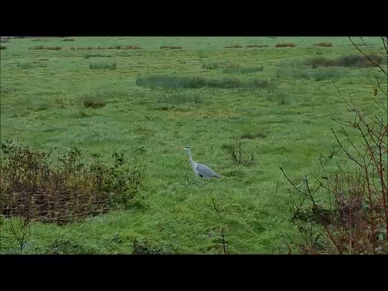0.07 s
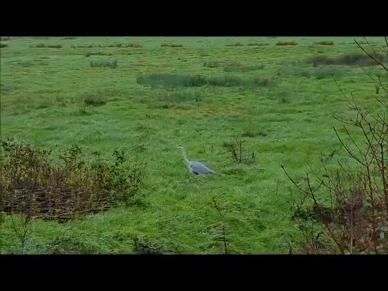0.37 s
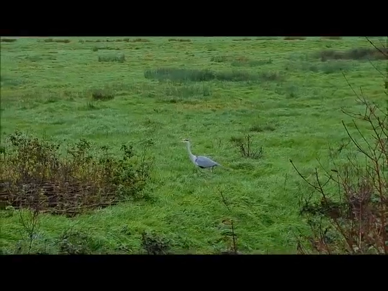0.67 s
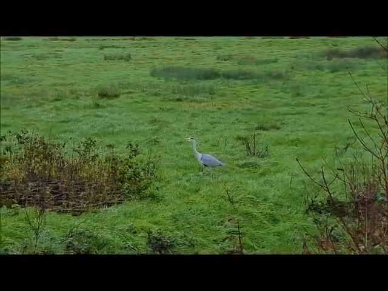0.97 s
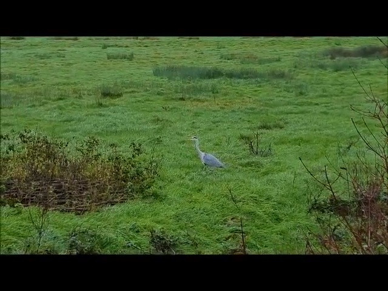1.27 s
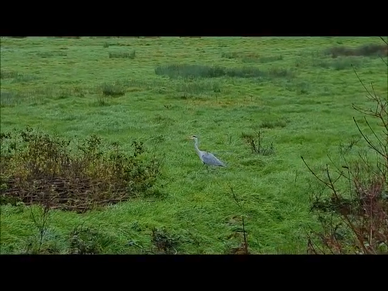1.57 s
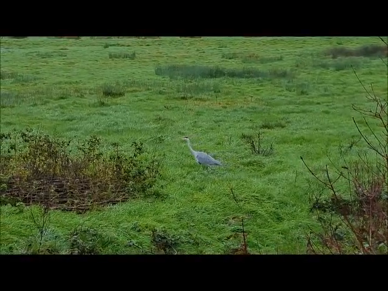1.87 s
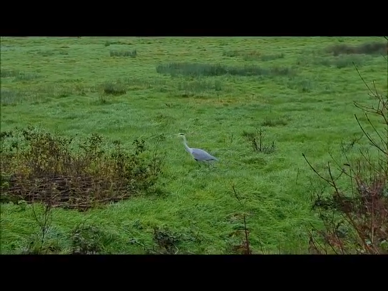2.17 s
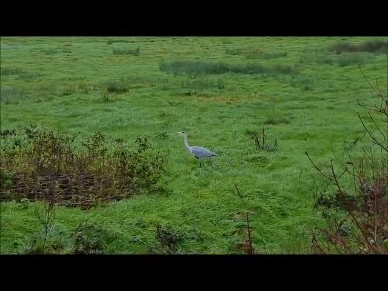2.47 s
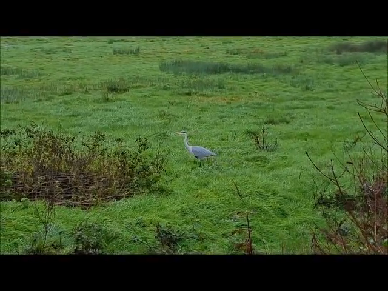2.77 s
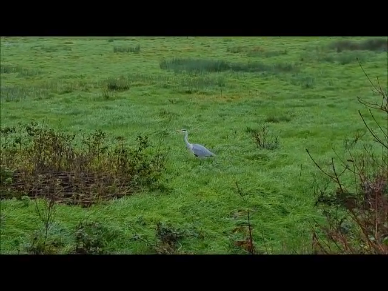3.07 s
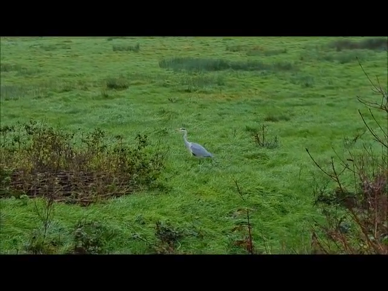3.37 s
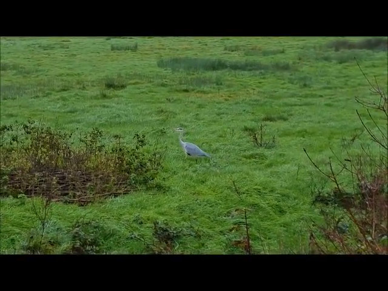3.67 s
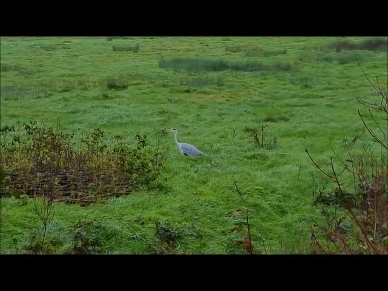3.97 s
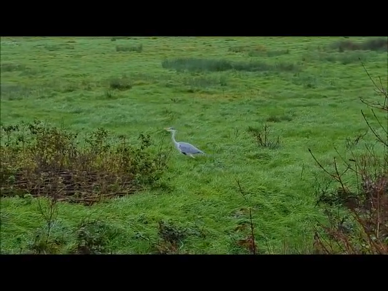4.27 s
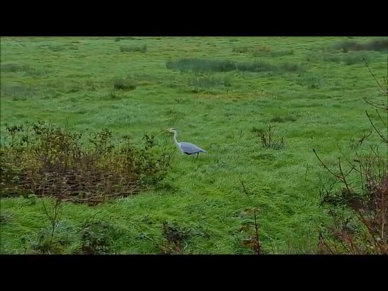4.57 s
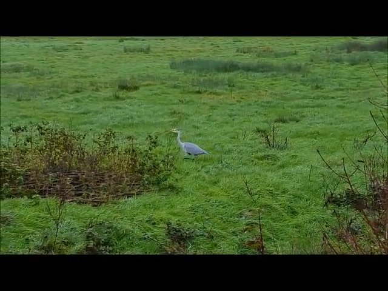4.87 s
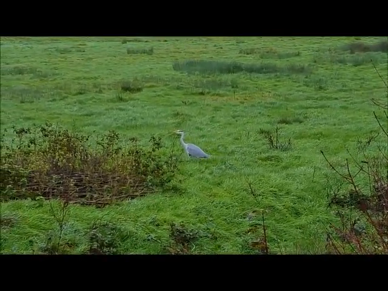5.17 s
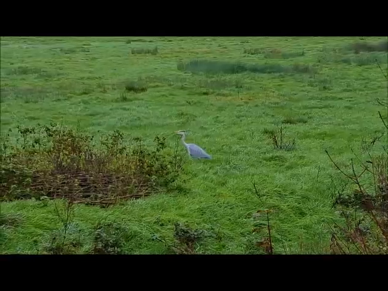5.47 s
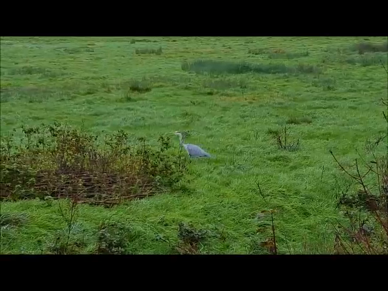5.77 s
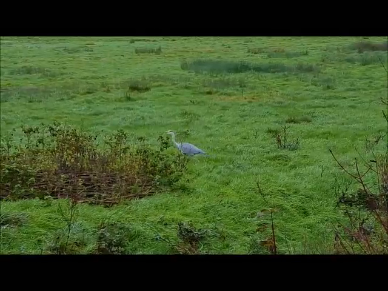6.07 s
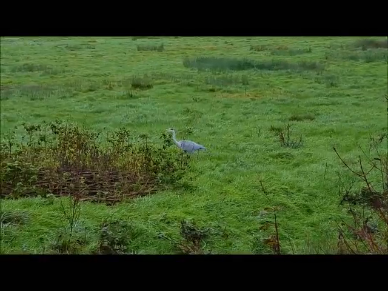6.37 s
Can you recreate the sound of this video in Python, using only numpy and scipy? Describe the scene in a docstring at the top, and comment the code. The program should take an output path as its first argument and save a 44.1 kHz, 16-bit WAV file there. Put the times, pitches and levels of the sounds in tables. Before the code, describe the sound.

Distant traffic rumbles over a meadow with faint bird chirps, broken by a ringing metal clank and a later dry clack.

```python
"""Far traffic fades in over a wet meadow: tyre roar, low rumble, droning engines.
Nearby metal strikes, bounces and rings; later something shuts with a dry clack. Both echo.
Small birds whistle, chirp and tick among soft rustles and light clicks.
A faint hiss on the right stops with a click."""
import sys
import numpy as np
from scipy import signal
from scipy.fft import rfft, irfft, next_fast_len
from scipy.io import wavfile
from scipy.ndimage import uniform_filter1d

SR = 44100
rng = np.random.default_rng(int(sys.argv[2]) if len(sys.argv) > 2 else 0)


def materialize(psi):
    """Save the field psi as 16-bit PCM at rate SR to the path in sys.argv[1].

    A 1-D psi becomes a single channel; in a 2-D psi each row is a channel.
    """
    bounded = np.clip(np.atleast_2d(psi).T, -1, 1)
    quanta = np.round(bounded * 32767).astype(np.int16)
    wavfile.write(sys.argv[1], SR, quanta)


N = 283563
TIME_S = np.arange(N) / SR

# noise spectra, shape only: freq_hz, density_db
RUMBLE_SPECTRUM = [(10, -15), (27, -10.5), (42, -4.5), (60, -1.2), (80, 0), (100, -1.8), (125, -5.3),
                   (165, -11.5), (235, -15), (330, -26), (600, -54)]
ROAR_SPECTRUM = [(60, -22), (250, -5.5), (340, -6.3), (480, -1.8), (600, -.4), (730, -2.6), (980, 1.9),
                 (1300, -2.9), (1650, -4.1), (2050, -10.2), (2500, -17.6), (3200, -22.2), (4400, -31.2),
                 (9000, -50)]
THUD_SPECTRUM = [(100, -36), (450, 17), (1000, 6), (2000, 4.5), (2700, 2.5), (4300, -10), (6300, -30),
                 (9000, -58), (14000, -68)]
RATTLE_SPECTRUM = [(300, -5), (2000, -2.5), (2900, 2), (3700, 10), (4750, 3.5), (5400, -13), (6400, -8),
                   (8500, -42), (14000, -67)]
BOOM_SPECTRUM = [(120, -16), (300, -9.5), (480, 8.5), (720, -5), (980, 6.5), (1400, -2), (2000, -28),
                 (2600, -40), (6000, -43), (12000, -72)]
SNAP_SPECTRUM = [(400, 2.5), (1000, 3), (1800, -8), (2600, 9), (3100, -13), (4100, 2), (5000, -6),
                 (5700, -2.5), (6500, -29), (9000, -37), (14000, -50)]
KNOCK_SPECTRUM = [(150, -1), (350, -6.5), (530, 3), (780, -1), (1100, 2.5), (1700, 7), (2200, -2.5),
                  (2450, 4.5), (3000, -6.5), (3450, 0), (4700, -9), (5700, -18), (7000, -30), (12000, -66)]
CLICK_SPECTRUM = [(800, -31), (2000, -8.5), (2500, 13.5), (3150, 8), (4000, -8), (5300, 1), (8000, -22),
                  (15000, -27)]
HISS_SPECTRUM = [(1500, -14), (2400, 1.5), (2950, 6.5), (3700, -5.5), (4700, -11), (6200, -4.5),
                 (6900, -11.5), (8000, -17.5), (10000, -26), (15000, -30)]
RUSTLE_SPECTRUM = [(2000, 18), (5000, -1), (7500, 11.5), (10000, -3), (13000, 7), (15500, -3)]
MIC_SPECTRUM = [(3000, 11), (6500, 5), (8000, 3), (10000, -38), (12500, 1), (15500, 4.5)]
# traffic level curves: time_s, level_db
RUMBLE_LEVELS = [(.85, -51.5), (1.05, -47.5), (2.08, -44), (2.18, -48), (2.4, -45), (6.43, -44.5)]
ENGINE_LEVELS = [(.7, -50.5), (1.05, -43), (2.15, -54.5), (2.55, -42.5), (3.65, -52), (4.3, -45.5),
                 (5, -51), (5.5, -45), (6.43, -43.5)]
# impacts: start_s, level_db
CLANK_HITS = [(1.2171, -20), (1.2468, -30), (1.254, -29), (1.2786, -29.5)]
LATCH_HITS = [(4.8697, -28), (4.885, -37)]
CLICK_HITS = [(2.166, -50), (3.153, -43.5), (4.479, -55)]
# modes of the metal: freq_hz, relative_db, t60_s
METAL_MODES = [(440, -22, 0.34), (510, -9, 0.58), (980, -19, 0.78), (1440, -2, 0.4), (2044, -2.5, 0.44),
               (2930, -3, 0.8), (3080, -18, .6), (3388, -2, 0.36), (3580, -6, .31), (3870, -16, 0.21),
               (4177, -21, 0.31), (4470, -16, 0.53), (4770, -10, 0.35), (6232, -20.5, 0.61),
               (6380, -24, 0.6), (7870, -23, 0.23)]
# ticking bird: start_s, level_db
BIRD_TICKS = [(3.37, -64), (3.448, -66), (3.557, -66), (5.232, -63.5), (5.357, -70), (5.561, -68)]
# near-level bird whistles: start_s, length_s, level_db, pitch_hz
BIRD_WHISTLES = [(.965, 0.1, -59, 5420), (2.947, 0.083, -73, 5360), (3.69, 0.058, -72.5, 6720),
                 (5.388, .094, -80, 6850), (6.345, 0.1, -78, 7000)]
# slurred bird chirps: start_s, length_s, level_db, pitch_hz, glide_oct, left_minus_right_db
BIRD_CHIRPS = [(.96, 0.012, -66, 5500, -.09, 4), (1.628, 0.041, -59.5, 2860, -0.079, 4),
               (2.131, 0.047, -61, 2750, -0.28, -2), (2.295, 0.047, -70.5, 6300, -0.015, 12),
               (2.553, .018, -71, 4380, .07, -6), (2.822, 0.018, -68, 3980, 0.28, 1),
               (3.033, .01, -58, 4370, .25, 13), (3.048, 0.035, -59.5, 4050, 0.024, -5),
               (3.077, .021, -64, 3400, -.18, 12), (3.734, .028, -62, 2630, -.18, 12),
               (4.55, .05, -77, 5430, .09, 4), (4.645, .05, -76, 5200, 0.15, -3)]
# rustle swells: peak_s, level_db
RUSTLE_SWELLS = [(2.17, -65), (3.2, -66), (3.52, -65), (4.27, -69), (5.96, -75)]
# decay of the surroundings: freq_hz, t60_s
ECHO_DECAY = [(200, 0.81), (1500, 1.1), (3300, 1.43), (4500, 0.75), (6000, 0.91), (12000, 0.76)]
# two microphone ports: freq_hz, coherence, left_lead_rad
MIC_PORTS = [(100, .98, .01), (210, .96, .15), (370, .74, .08), (570, .86, .37), (760, .46, 1.1),
             (1000, .65, .92), (1270, .72, 2.3), (1480, .1, 1), (1700, .2, 2), (1920, .6, .01),
             (2250, .6, 2.9), (2650, .05, 3.01), (4000, .05, 4.5), (6500, .05, 7)]

METAL_START_S = 1.2175


def traffic():
    """Lumpy low rumble under an even roar of far tyres."""
    rumble = noise(RUMBLE_SPECTRUM) * amp(curve(RUMBLE_LEVELS) + 0.56 * drift(2.04))
    roar = noise(ROAR_SPECTRUM) * amp(-44.5 + 0.062 * drift(1.2))
    return rumble + roar


def engines():
    """Two low drones, the lorry's swelling late, and a thin higher hum."""
    engine = drone(74.5, curve(ENGINE_LEVELS), waver_db=2)
    lorry_db = np.interp(TIME_S, [5.28, 5.74], [-52.5, -42.5])
    lorry = drone(59.25, lorry_db, waver_db=1.5)
    hum = drone(201.6, level_db=-65, waver_db=4)
    return engine + lorry + hum


def drone(pitch_hz, level_db, waver_db):
    """One engine order, wavering on its long path through the air."""
    cycles = np.cumsum(pitch_hz * (1 + 0.00794 * drift(2.37))) / SR
    return np.sqrt(2) * amp(level_db + waver_db * drift(15)) * np.sin(2 * np.pi * cycles)


def clank():
    """Metal strikes and bounces; loose parts rattle, the hollow body booms."""
    out = np.zeros((2, N))
    for start_s, level_db in CLANK_HITS:
        add(out, start_s, blow(THUD_SPECTRUM, level_db, rise_s=0.0002, t60_s=0.025, left_db=-2.5))
    rattle = blow(RATTLE_SPECTRUM, level_db=-33.5, rise_s=0.0095, t60_s=0.21, left_db=-4.5)
    boom = blow(BOOM_SPECTRUM, level_db=-33, rise_s=0.0097, t60_s=0.54, left_db=-0.3)
    add(out, METAL_START_S, rattle)
    add(out, METAL_START_S + 0.014, boom)
    return out + amp(-13) * echo(out)


def metal_ring(level_db=-40, rise_s=0.003):
    """The struck metal's modes ring on; high ones are shaded from the left port."""
    age_s = np.arange(SR) / SR
    attack = 1 - np.exp(-age_s / rise_s)
    out = np.zeros((2, N))
    for freq_hz, relative_db, t60_s in METAL_MODES:
        lead_rad = lookup(MIC_PORTS, freq_hz, column=2)
        phase_rad = 2 * np.pi * rng.random() - np.array([[0], [lead_rad]])
        decay = amp(level_db + relative_db - 60 * age_s / t60_s)
        mode = attack * decay * np.sin(2 * np.pi * freq_hz * age_s + phase_rad)
        shade = min(freq_hz / 4000, 1)
        add(out, METAL_START_S, mode * pan(left_db=-5 * shade))
    return out


def clack(body_lag_s=0.008):
    """Something shuts: the latch snaps twice, the body answers with a dry knock."""
    out = np.zeros((2, N))
    for start_s, level_db in LATCH_HITS:
        add(out, start_s, blow(SNAP_SPECTRUM, level_db, rise_s=0.0007, t60_s=0.035, left_db=-3))
    knock = blow(KNOCK_SPECTRUM, level_db=-28.5, rise_s=0.0057, t60_s=0.18, left_db=-2)
    add(out, LATCH_HITS[0][0] + body_lag_s, knock)
    return out + amp(-9) * echo(out)


def blow(spectrum, level_db, rise_s, t60_s, left_db, min_coherence=0.57):
    """An impact's dense short resonances, as noise that builds and decays."""
    age_s = np.arange(SR) / SR
    envelope = amp(level_db - 60 * age_s / t60_s) * (1 - np.exp(-age_s / rise_s))
    return noise(spectrum, SR, min_coherence) * envelope * pan(left_db)


def birds(flutter_db=2):
    """Ticks right, whistles left, chirps all around; chirps and ticks echo more than whistles."""
    ticks, whistles, chirps = np.zeros((3, 2, N))
    for start_s, level_db in BIRD_TICKS:
        tick = bird_note(0.006, level_db, pitch_hz=6110, glide_oct=0.27, jitter=0.025)
        add(ticks, start_s, tick * pan(left_db=-8))
    for start_s, length_s, level_db, pitch_hz in BIRD_WHISTLES:
        whistle = bird_note(length_s, level_db, pitch_hz, glide_oct=-0.021, jitter=0.01)
        add(whistles, start_s, whistle * pan(left_db=4.5))
    for start_s, length_s, level_db, pitch_hz, glide_oct, left_db in BIRD_CHIRPS:
        chirp = bird_note(length_s, level_db, pitch_hz, glide_oct, jitter=0.035)
        add(chirps, start_s, chirp * pan(left_db))
    direct = (ticks + whistles + chirps) * amp(flutter_db * drift(150))
    echo_send = amp(-9) * ticks + amp(-13) * whistles + amp(-8) * chirps
    return direct + echo(echo_send)


def bird_note(length_s, level_db, pitch_hz, glide_oct, jitter):
    """A soft-edged, unsteady whistle gliding through its pitch."""
    samples = round(length_s * SR)
    glide_hz = pitch_hz * 2 ** (glide_oct * np.linspace(-0.5, 0.5, samples))
    wobble = unit_rms(uniform_filter1d(rng.standard_normal(SR), size=30))[:samples]
    cycles = np.cumsum(glide_hz * (1 + jitter * wobble)) / SR
    envelope = amp(level_db) * signal.windows.tukey(samples, 0.5)
    return np.sqrt(2) * envelope * np.sin(2 * np.pi * cycles)


def clicks():
    """Light twig-like clicks, right of centre."""
    out = np.zeros((2, N))
    for start_s, level_db in CLICK_HITS:
        click = blow(CLICK_SPECTRUM, level_db, rise_s=0.00087, t60_s=0.056, left_db=-7, min_coherence=0)
        add(out, start_s, click)
    return out + amp(-16) * echo(out)


def hiss(level_db=-63, stop_s=3.155, release_s=0.0089):
    """A thin steady hiss on the right that shuts off."""
    gate = np.clip((stop_s - TIME_S) / release_s, 0, 1)
    return noise(HISS_SPECTRUM) * amp(level_db) * gate * pan(left_db=-6.5)


def rustles(half_width_s=0.068, flutter_db=3.7):
    """Brief airy swells with a fine flutter."""
    swells = sum(amp(level_db) * np.exp(-((TIME_S - peak_s) / half_width_s) ** 2)
                 for peak_s, level_db in RUSTLE_SWELLS)
    return noise(RUSTLE_SPECTRUM) * swells * amp(flutter_db * drift(120))


def echo(sound, taps_per_s=3000, rise_s=0.04, wall_s=0.195, smear_s=0.015, wall_db=3):
    """Scattered reflections from bushes and a far wall; decay varies with frequency."""
    taps = rng.standard_normal((2, SR)) * (rng.random((2, SR)) < taps_per_s / SR)
    freq_hz, delay_s, bands = signal.stft(taps, SR, nperseg=256)
    boost_db = wall_db * np.exp(-((delay_s - wall_s) / smear_s) ** 2)
    decay_db = 60 * delay_s / lookup(ECHO_DECAY, freq_hz)[:, None]
    bands = bands * amp(boost_db - decay_db) * (1 - np.exp(-delay_s / rise_s))
    tail = signal.istft(bands, SR, nperseg=256)[1]
    return signal.fftconvolve(sound, tail / np.linalg.norm(tail[0]), axes=1)[:, :N]


def noise(spectrum, samples=N, min_coherence=0):
    """Coloured noise at both ports, rms 1: bass alike, treble only as far as it arrives directly."""
    fft_size = next_fast_len(samples, True)
    freq_hz = np.fft.rfftfreq(fft_size, 1 / SR)
    left, independent = rfft(rng.standard_normal((2, fft_size)))
    coherence = np.clip(lookup(MIC_PORTS, freq_hz), min_coherence, 1)
    right = coherence * left + np.sqrt(1 - coherence ** 2) * independent
    right *= np.exp(-1j * lookup(MIC_PORTS, freq_hz, column=2))
    coloured = np.array([left, right]) * amp(lookup(spectrum, freq_hz))
    return unit_rms(irfft(coloured, fft_size)[:, :samples])


def drift(rate_hz):
    """Random wander, rms 1."""
    knots_s = np.arange(0, TIME_S[-1] + 1, 0.5 / rate_hz)
    values = rng.standard_normal(4000)[:len(knots_s)]
    return unit_rms(np.interp(TIME_S, knots_s, values))


def amp(level_db):
    """Decibels to gain."""
    return 10 ** (np.asarray(level_db) / 20)


def unit_rms(sound):
    """Scale to rms 1."""
    return sound / np.sqrt(np.mean(sound ** 2) + 1e-20)


def lookup(table, freq_hz, column=1):
    """Interpolate a column over log frequency."""
    columns = np.transpose(table)
    return np.interp(np.log(freq_hz + 1), np.log(columns[0] + 1), columns[column])


def curve(table):
    """Interpolate a level curve at every sample."""
    return np.interp(TIME_S, *np.transpose(table))


def pan(left_db):
    """Stereo gains for a left-minus-right level."""
    return amp([[left_db / 2], [-left_db / 2]])


def add(mix, start_s, sound):
    """Mix a stereo sound in at start_s."""
    part = mix[:, round(start_s * SR):][:, :sound.shape[1]]
    part += sound[:, :part.shape[1]]


def scene():
    """All sources over the meadow."""
    bed = traffic() + engines() + hiss() + rustles()
    return bed + clank() + metal_ring() + clack() + clicks() + birds()


def record(dry):
    """Microphone self-noise, fade-in, band limit."""
    start_s, open_s, ease_s, depth_db = 0.45, 0.056, 0.48, -27
    mic_noise_db, cutoff_hz = -70, 15800
    age_s = TIME_S - start_s
    gate = np.clip(age_s / open_s, 0, 1)
    ease_db = depth_db * np.clip(1 - age_s / ease_s, 0, 1) ** 2
    faded = (dry + amp(mic_noise_db) * noise(MIC_SPECTRUM)) * gate * amp(ease_db)
    lowpass = signal.firwin(511, cutoff_hz, window=("kaiser", 9), fs=SR)
    return signal.oaconvolve(faded, lowpass[None], "same")


dry = scene()
out = record(dry)
materialize(out)
```